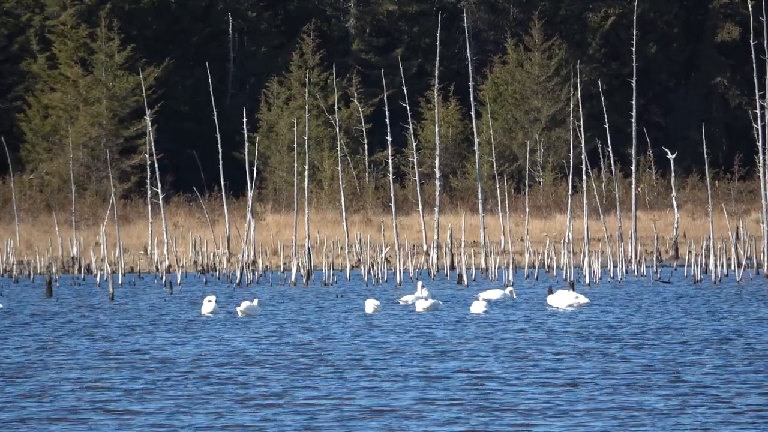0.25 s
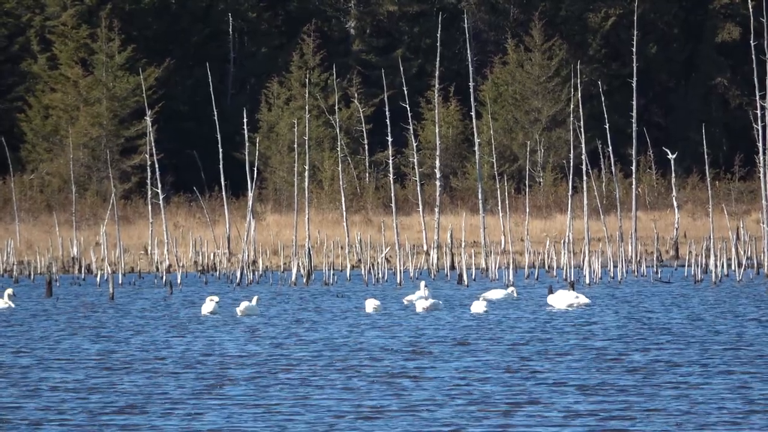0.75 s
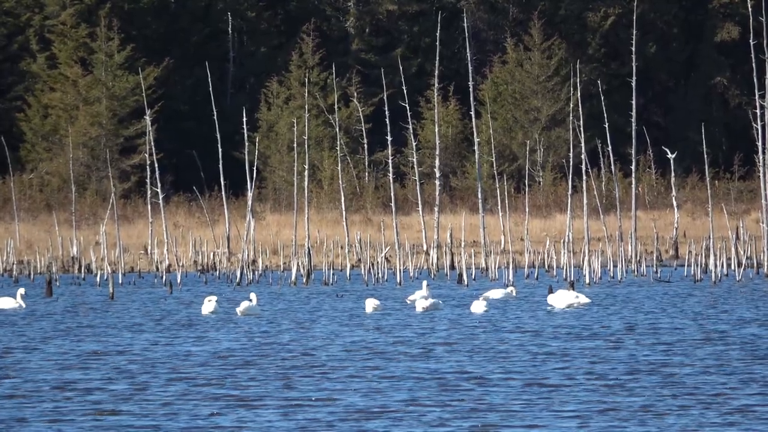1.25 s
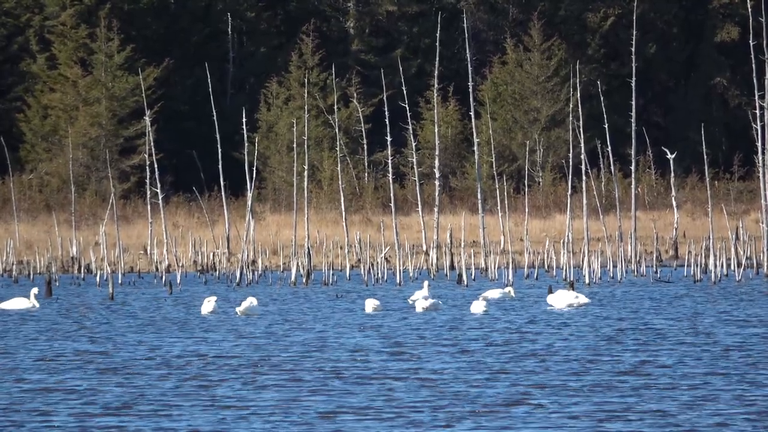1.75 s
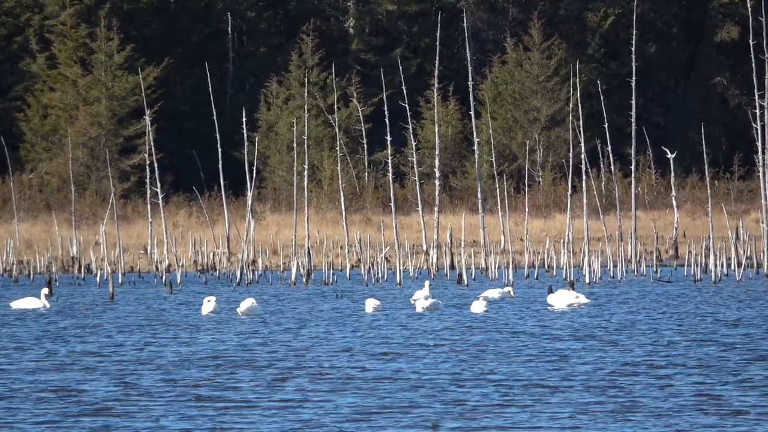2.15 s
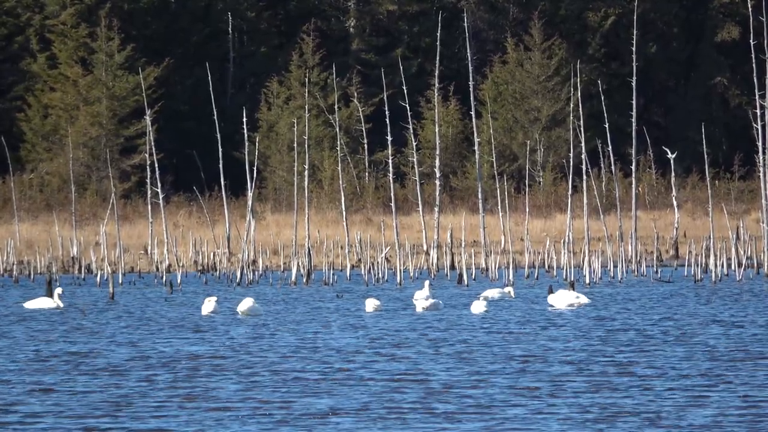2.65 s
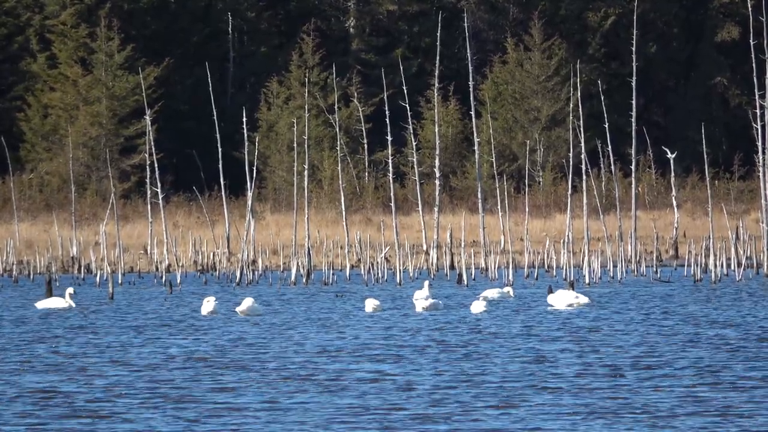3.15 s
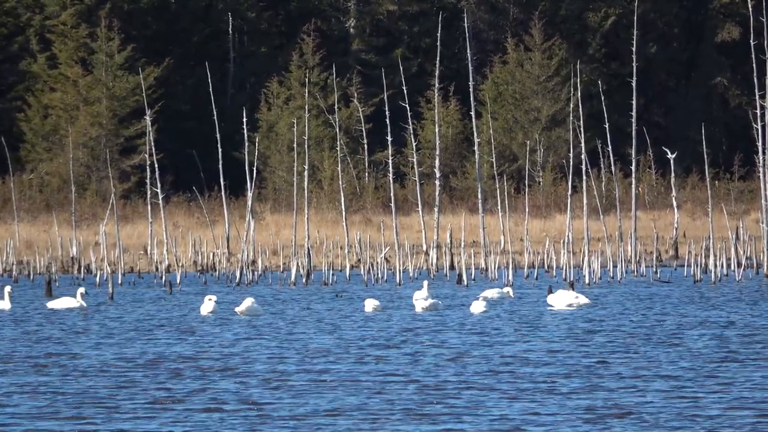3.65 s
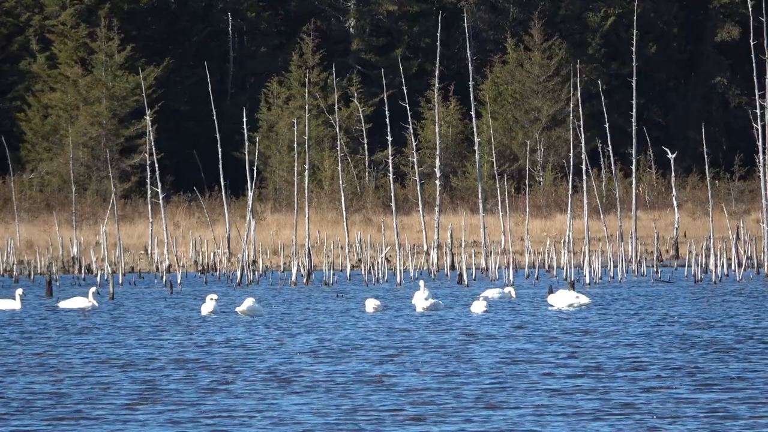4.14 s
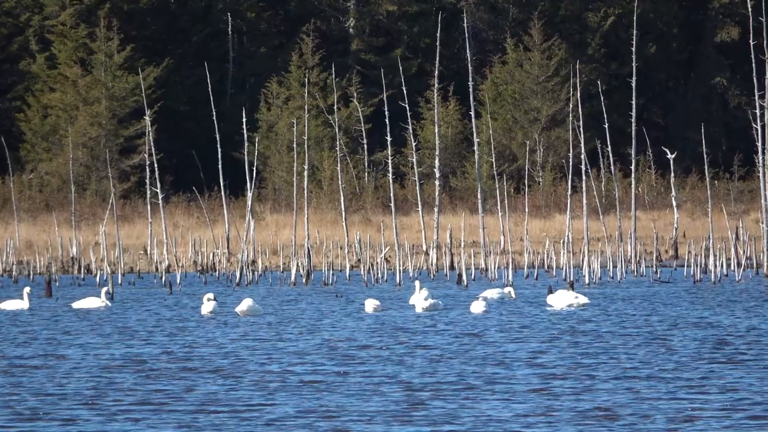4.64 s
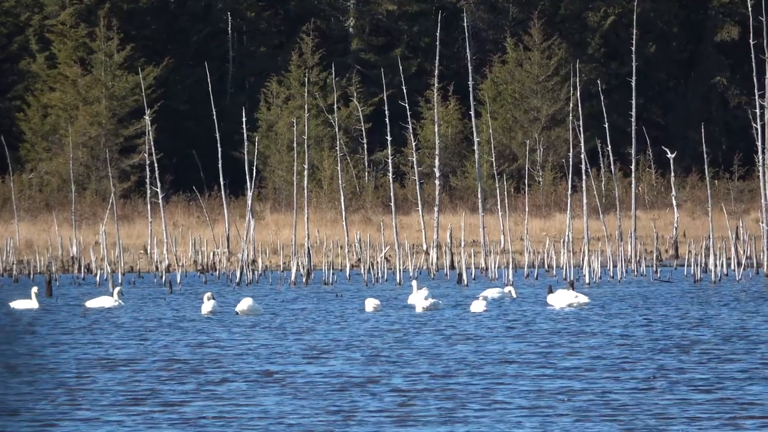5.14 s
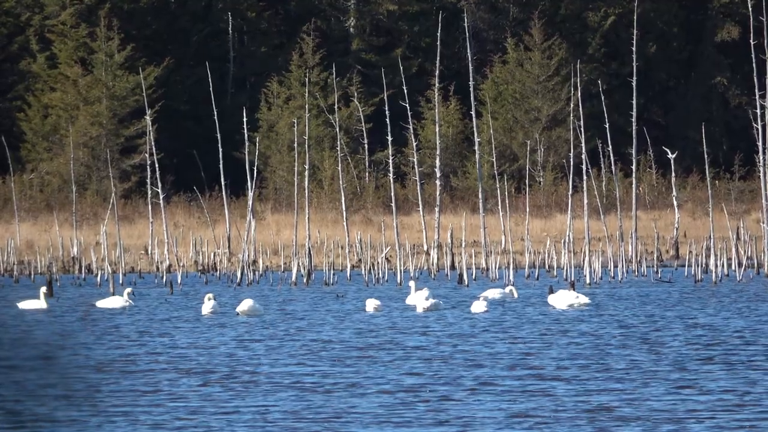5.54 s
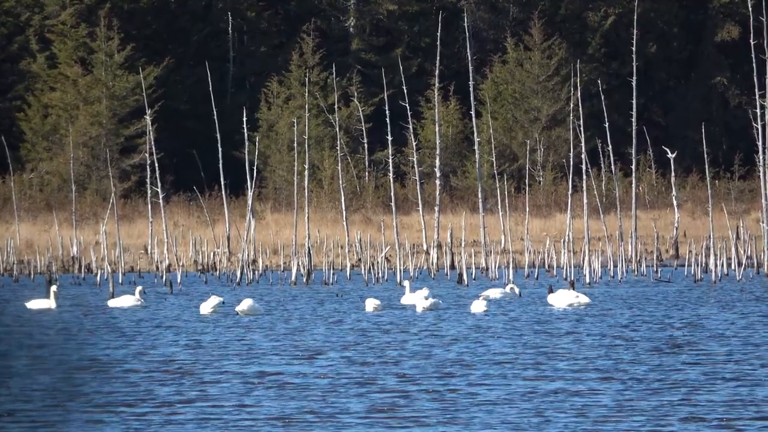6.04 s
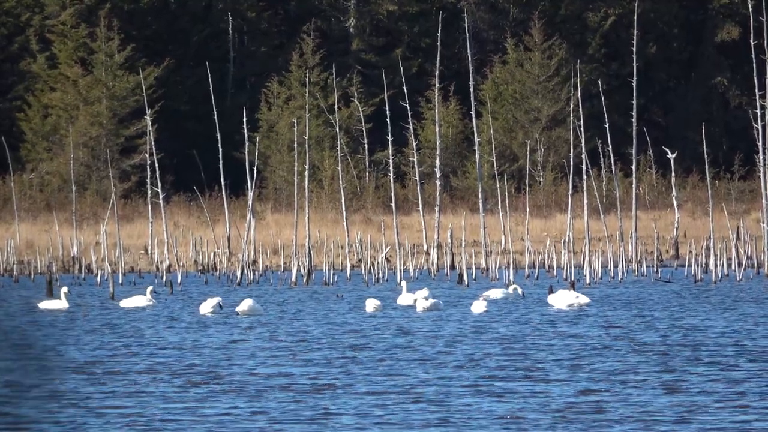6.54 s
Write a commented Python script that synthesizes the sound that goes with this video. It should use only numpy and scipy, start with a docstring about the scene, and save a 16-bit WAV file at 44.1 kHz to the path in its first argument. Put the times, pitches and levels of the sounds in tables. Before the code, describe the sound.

Heavy low wind rumble swells and bumps against an unshielded microphone beside an open lake. Behind it, far swans call in quick clear hoots and rough little croaks, thickening into chatter and then thinning out. Trees return a faint echo, and water and reeds hiss quietly. Toward the close, gusts roar and crackle, one longer honk sounds, and a big jolt of wind distorts the microphone.

```python
"""On a windy lake ringed by trees, distant swans honk and croak, and the trees throw the calls back.
Honks are sums of four sine partials; croaks are slow pulses mixed with breath noise.
Wind buffets the bare microphone with a heavy rumble of shaped noise, and at set moments overloads it.
Under it lie the murmur of the far flock and the hiss of ripples and reeds, both shaped noise,
with faint bright ticks and small puffs of wind made of short noise bursts."""
import sys
import numpy as np
from scipy import signal
from scipy.fft import rfft, irfft, next_fast_len
from scipy.io import wavfile
from scipy.ndimage import uniform_filter1d

SR = 44100
rng = np.random.default_rng(int(sys.argv[2]) if len(sys.argv) > 2 else 0)


def file_out(sig):
    """Save sig as 16-bit WAV at sys.argv[1]."""
    # one column per channel
    cols = np.atleast_2d(sig).T
    # limit, then scale
    lim = np.clip(cols, -1, 1)
    pcm = np.round(lim * 32767).astype(np.int16)
    wavfile.write(sys.argv[1], SR, pcm)


def magnitude_from_level(level_db):
    """Linear magnitude for a level in decibels (20 dB per decade)."""
    exponent = np.asarray(level_db, float) / 20
    return 10 ** exponent


N = 299439  # length of the scene in samples

# how the swan's windpipe boosts or weakens each pitch: (pitch_hz, gain_db)
WINDPIPE_CURVE = [(300, -8.5), (500, 4), (900, 1.5), (1200, 10), (1480, -1.5), (1700, -14), (2250, -19.5),
                  (4000, -49)]


def evened(x):
    """Scales a sound to an rms level of 1."""
    return x / np.sqrt(np.mean(x ** 2) + 1e-20)


def read(points, hz):
    """Reads a spectrum on a log-frequency axis, silent outside its ends."""
    point_hz, point_db = np.transpose(points)
    return np.interp(np.log(hz + 1), np.log(point_hz + 1), point_db, left=-120, right=-120)


def along(rows):
    """Draws each column of a time table as a line through every sample."""
    row_s, *columns = np.transpose(rows)
    return [np.interp(np.arange(N) / SR, row_s, column) for column in columns]


def add(mix, start_s, sound):
    """Mixes a sound in at its start time, cut off where the mix ends."""
    part = mix[round(start_s * SR):][:len(sound)]
    part += sound[:len(part)]


def filtered(x, points, size):
    """Shapes a sound by a spectrum, working on a block of the given size."""
    gain = magnitude_from_level(read(points, np.fft.rfftfreq(size, 1 / SR)))
    return irfft(rfft(x, size) * gain, size)


def noise(points):
    """Makes steady noise of the given spectrum, rms 1."""
    size = next_fast_len(N)
    return evened(filtered(rng.standard_normal(size), points, size)[:N])


def lumps(seconds, depth_db):
    """A random gain that wanders over about the given time, with the given rms depth."""
    width = max(round(seconds * SR), 1)
    smooth = uniform_filter1d(uniform_filter1d(rng.standard_normal(N), width), width)
    return magnitude_from_level(depth_db * evened(smooth))


def wobbled(hz, jitter):
    """Phase of a voice whose pitch trembles a little around hz; jitter is a share of the pitch."""
    wobble = evened(uniform_filter1d(rng.standard_normal(SR // 2), 150))[:len(hz)]
    return 2 * np.pi * np.cumsum(hz * (1 + jitter * wobble)) / SR


def honk(length_s, pitch_hz, glide_hz, first_db, octave_db):
    """A clean tone scoops up to pitch and sags at the end; the windpipe colours its upper two partials."""
    scoop, scoop_s = 0.0907, 0.01754  # share by which both ends are flat, and how fast that dies away
    attack_s, release_s = .04, .04
    third_db, fourth_db = -6, -17  # relative to the octave, before the windpipe
    t = np.arange(0, length_s, 1 / SR)
    flat = scoop * (np.exp(-t / scoop_s) + np.exp((t - length_s) / scoop_s))
    hz = (pitch_hz + glide_hz * (t / length_s - .5)) * (1 - flat)
    phase = wobbled(hz, jitter=.005)
    tone = magnitude_from_level(first_db) * np.sin(phase) + magnitude_from_level(octave_db) * np.sin(2 * phase)
    for k, db in enumerate((third_db, fourth_db), start=3):
        tone += magnitude_from_level(octave_db + db + read(WINDPIPE_CURVE, k * hz)) * np.sin(k * phase)
    swell = np.minimum(t / attack_s, 1) * np.minimum((length_s - t) / release_s, 1)
    return np.sqrt(2) * tone * np.sin(np.pi / 2 * swell) ** 2


def croak(length_s, start_hz, end_hz, level_db, rough):
    """Slow pulses through the windpipe; roughness shakes the pitch and mixes in breath noise each cycle."""
    size = round(length_s * SR)
    hz = start_hz + (end_hz - start_hz) * np.linspace(0, 1, size) ** 1.496
    phase = wobbled(hz, jitter=0.059 * rough)
    pulses = sum(np.cos(k * phase) for k in range(1, 16))
    breath = (1 + np.cos(phase)) ** 2 * rng.standard_normal(size)
    pulses = evened(filtered(pulses, WINDPIPE_CURVE, 4 * size)[:size])
    breath = evened(filtered(breath, WINDPIPE_CURVE, 4 * size)[:size])
    breath_share = np.clip(rough, 0, 1) ** 1.5
    voice = evened((1 - breath_share) * pulses + breath_share * breath)
    return magnitude_from_level(level_db) * voice * signal.windows.tukey(size, .85)


def shore(x):
    """Echoes of random sign: a dying scatter off the water and a late cluster from the tree line."""
    taps = np.zeros(SR // 2)
    slots = np.arange(300, len(taps) - 22, 22)  # one echo falls somewhere in each slot of 22 samples
    taps[slots + rng.integers(0, 22, len(slots))] = rng.choice([-1., 1.], len(slots))
    t = np.arange(len(taps)) / SR
    scatter = magnitude_from_level(-60 * t / .9)  # falls 60 dB in 0.9 s
    tree_line = .3 * np.exp(-((t - .125) / .03) ** 2)
    taps *= scatter + tree_line
    return signal.fftconvolve(x, taps / np.linalg.norm(taps))[:N]


def flock():
    """All calls, direct and echoed; gusty air over the water makes the far calls flicker."""
    # clear notes, levels before the swell, pitch before the scoop:
    # (start_s, length_s, middle_pitch_hz, glide_from_start_to_end_hz, fundamental_db, octave_db)
    honks = [(0.288, 0.099, 452, -19, -49.2, -61), (0.381, 0.14, 744, 53, -42, -46.5),
             (0.828, 0.065, 620, -55, -65, -47), (0.852, 0.11, 795, -57, -53, -52.5),
             (1.054, 0.089, 478, -68, -47, -55.4), (1.508, 0.14, 487, 89, -53, -66),
             (1.569, 0.12, 746, 26, -47, -43.5), (1.728, 0.12, 568, -5, -60.0, -40.5),
             (1.96, 0.119, 450, 61, -52, -57.5), (2.107, 0.093, 406, -76, -48.5, -60),
             (2.338, 0.078, 578, 58, -66.0, -39), (2.405, 0.06, 754, -73, -36, -45),
             (2.396, 0.13, 456.5, 24, -50, -53), (2.494, 0.081, 469, -22, -41, -47.8),
             (2.654, 0.12, 745.4, 46, -43, -40.5), (2.711, 0.067, 488, -7, -44, -40),
             (2.861, 0.069, 440, -62, -45, -58), (2.931, 0.073, 635, 77, -43.5, -43),
             (3.299, 0.072, 484, -16, -53, -44), (3.373, 0.11, 576.6, -13, -49, -34.5),
             (3.448, 0.064, 477, 0, -38, -47), (3.543, 0.085, 502.6, 52.5, -40.5, -39.0),
             (3.571, 0.129, 803, -129, -42, -52), (3.757, 0.12, 727, 92, -40, -41.5),
             (3.97, 0.056, 496, 73, -36.5, -63), (4.008, 0.1, 800, 46, -46.7, -75),
             (4.049, 0.064, 500, 79, -46, -43.6), (4.064, 0.08, 659, -43, -40.5, -45.5),
             (4.258, 0.061, 737, -24, -35.5, -53), (4.36, 0.051, 764, -123, -38, -59),
             (4.395, 0.098, 486, 34, -40.5, -44), (4.453, 0.067, 570, 94, -67.1, -37),
             (4.474, 0.099, 679, -60, -40.5, -40), (4.583, 0.079, 778, -107, -39.5, -47.5),
             (4.808, 0.13, 527.5, 22, -51, -41.3), (4.901, 0.075, 756, -5, -39.5, -43),
             (4.897, 0.084, 674, -86, -41, -42.5), (4.913, 0.082, 555, -14, -54.0, -47.2),
             (5.21, 0.058, 553, 46, -69, -39), (5.239, 0.087, 743, -96, -44.5, -44),
             (5.298, 0.09, 602, 4, -58, -43), (5.641, 0.074, 477, -4, -45, -45),
             (5.778, 0.066, 590, -8, -50.5, -43), (6.538, 0.35, 477, 36.5, -47, -44)]
    # low hoarse notes, level before the fades:
    # (start_s, length_s, start_pulse_rate_hz, end_pulse_rate_hz, level_db, roughness_0_to_1)
    croaks = [(0.372, 0.053, 153, 142, -44, 0.65), (1.558, 0.062, 263.4, 234, -42, 0.43),
              (1.726, 0.063, 264.5, 259.5, -40, 0.5), (2.466, 0.068, 209, 237, -47.5, 0.2),
              (2.639, 0.048, 227.4, 263, -38, 0.63), (2.862, 0.115, 222.7, 253.5, -49, 0.47),
              (3.2, 0.23, 161.5, 182.8, -46, 0.2), (3.347, 0.084, 172.2, 186.4, -39, 0.3),
              (3.546, 0.14, 188.6, 216.6, -41.5, 0.49), (3.993, 0.11, 205, 195.3, -44, 0.7),
              (4.36, 0.08, 250, 286, -41, 0.5), (4.433, 0.13, 191, 196.3, -43, 0.7),
              (4.789, 0.12, 241.5, 273.7, -39.5, 0.48), (5.215, 0.092, 260.6, 290, -43.5, 0.7),
              (5.64, 0.029, 227, 241, -43, 0.26), (5.772, 0.036, 266.3, 299, -44, 0.65)]
    calls = np.zeros(N)
    for start_s, *note in honks:
        add(calls, start_s, honk(*note))
    for start_s, *note in croaks:
        add(calls, start_s, croak(*note))
    calls *= lumps(.012, depth_db=1.8)
    return calls + magnitude_from_level(-10) * shore(calls)


def wind():
    """Turbulence at the microphone: noise layers of rumble, flutter and lumpy roar, swelled by gusts."""
    # wind between gusts, before the microphone: (time_s, rumble_db, flutter_db)
    calm = [(.05, -2.5, -28.5), (.3, -17, -29), (.8, -13, -23.5), (1.2, -15, -28), (1.55, -16.5, -34),
            (1.9, -15, -34), (2.2, -20, -33.5), (2.5, -15, -33.5), (2.9, -16, -31), (3.3, -16.5, -33.5),
            (3.6, -12, -29.5), (3.95, -15.5, -32.5), (4.4, -12, -32), (4.9, -13.5, -29),
            (5.3, -13.5, -28.5), (5.95, -11.5, -36), (6.4, -17, -26), (6.79, -15.5, -36)]
    # gusts that strike the capsule, length between the points where they have sunk to 1/e:
    # (middle_s, length_s, rumble_db, flutter_db, roar_db)
    gusts = [(0.406, .08, -4, -24.5, -39), (0.555, 0.09, -9, -30, -42.5), (.66, .1, -3, -38, -38.5),
             (0.925, 0.051, -7.5, -19.5, -43), (1.041, 0.07, -8.5, -41, -43), (1.389, .08, -5.5, -41, -55),
             (1.71, 0.053, -6, -19, -51), (2.86, 0.11, -9, -39, -59), (3.088, 0.1, -9, -30, -52),
             (3.224, 0.066, -11, -22, -58), (3.434, 0.12, -13, -31, -49), (3.73, 0.23, -7, -26, -46.5),
             (4.088, 0.17, -10.5, -24, -60), (4.535, 0.093, -12, -27, -42.5), (5.117, 0.12, -6.5, -28, -50),
             (5.405, 0.093, -2.5, -18, -27), (5.572, 0.18, -7, -21, -40), (5.666, 0.15, -17, -18.5, -39.5),
             (5.834, .07, -12, -26, -57), (6.135, 0.16, -7, -14.5, -29), (6.272, 0.078, -3, -37, -42),
             (6.371, 0.093, -6, -25, -36.5), (6.612, 0.21, -4.5, -21.5, -41),
             (6.678, 0.079, 0.5, -12.5, -36), (6.75, .04, -1.5, -33, -32.5)]
    # spectra of the three layers, relative level in each hertz: (pitch_hz, level_db)
    rumble_curve = [(1.8, -14.5), (3.0, 0), (24, 2.5), (36, -11), (70, -18), (91, -33), (150, -120)]
    flutter_curve = [(35, 10), (55, -7), (90, -5), (140, -15), (190, -30)]
    roar_curve = [(110, -75), (160, 5.5), (250, -4.5), (400, -17), (700, -29.5)]
    rumble_db, flutter_db = along(calm)
    # roar level at a flutter of -26 dB, and the share of the flutter's swings that it follows
    roar_db = -47.5 + 0.45 * (flutter_db + 26)
    t = np.arange(N) / SR
    power = magnitude_from_level([rumble_db, flutter_db, roar_db]) ** 2
    for middle_s, length_s, *gust_db in gusts:
        swell = np.exp(-2 * (2 * (t - middle_s) / length_s) ** 2)
        power += magnitude_from_level(gust_db)[:, None] ** 2 * swell
    rumble, flutter, roar = np.sqrt(power)
    lumpy_roar = evened(noise(roar_curve) * lumps(0.0083, depth_db=3))
    return rumble * noise(rumble_curve) + flutter * noise(flutter_curve) + roar * lumpy_roar


def bursts(events, low_hz, high_hz, decay_s):
    """Short band-limited bursts of noise, each with a quick rise and a soft fall."""
    out, t = np.zeros(N), np.arange(1500) / SR
    band = signal.butter(N=4, Wn=[low_hz, high_hz], btype="band", fs=SR, output="sos")
    shape = t / decay_s * np.exp(1 - t / decay_s)
    for start_s, peak_db in events:
        grain = evened(signal.sosfilt(band, rng.standard_normal(len(t))))
        add(out, start_s, magnitude_from_level(peak_db) / 2 * grain * shape)  # noise peaks reach about twice its rms
    return out


def small_noises():
    """Faint ticks and puffs: bright bursts that die at once, and duller ones that last a little longer."""
    # faint bright ticks: (start_s, rough_peak_db)
    ticks = [(0.8605, -51), (1.1992, -44), (2.3536, -41), (2.7537, -42), (2.9737, -46), (3.4152, -43),
             (3.5304, -42.5), (4.0123, -45), (4.389, -42), (4.4254, -42), (5.63, -39), (6.2617, -40),
             (6.4044, -41)]
    # small puffs of wind: (start_s, rough_peak_db)
    puffs = [(5.1, -40), (5.138, -46), (5.508, -48), (5.552, -39), (5.599, -40), (6.054, -52), (6.233, -36),
             (6.259, -44), (6.3, -39), (6.346, -37.5), (6.462, -37.5)]
    return bursts(ticks, 5000, 13000, decay_s=.0007) + bursts(puffs, 450, 1900, decay_s=.002)


def lake():
    """Shaped noise for the murmur of far birds and water, and for a hiss that crackles slightly."""
    # spectra, relative level in each hertz: (pitch_hz, level_db)
    murmur_curve = [(150, -15), (260, 1.5), (676, 0.5), (1170, -4), (2200, -16), (2860, -21), (4840, -120)]
    hiss_curve = [(1000, -1), (1700, -22.5), (1870, -19), (2730, -7.5), (4330, -3), (5560, -11), (7990, -6),
                  (12700, -14.5), (15600, -17)]
    # loudness of the hiss of ripples and reeds: (time_s, level_db)
    ripples = [(0.06, -57.5), (0.19, -56), (1.5, -58), (4.28, -56), (4.82, -53), (5.14, -56.5),
               (5.22, -54.5), (6.58, -56), (6.73, -59), (6.79, -56)]
    murmur = magnitude_from_level(-47) * evened(noise(murmur_curve) * lumps(.06, depth_db=.8))
    slow, crackle = lumps(0.037, depth_db=0.76), lumps(0.0017, depth_db=1.04)
    hiss = evened(noise(hiss_curve) * slow * crackle)
    return murmur + magnitude_from_level(along(ripples)[0]) * hiss


def scene():
    """Birds, wind, small noises and lake at one microphone."""
    return (flock() + wind() + small_noises() + lake())[None]


def low_pass(x):
    """Removes everything above the highest recorded frequency."""
    return signal.sosfilt(signal.butter(12, 15710, fs=SR, output="sos"), x)


def record(dry):
    """Near its stop the capsule goes deaf to all but a sagging drift, then jolts free; peaks are clipped."""
    # the capsule is pushed toward its stop and goes deaf, jolt level before its shaping:
    # (start_s, length_s, deafness_0_to_1, jolt_on_release_db)
    overloads = [(.653, .006, 1, -36), (5.425, .005, 1, -30), (5.59, .002, 1, -40), (6.119, .003, 1, -40),
                 (6.241, .028, .45, -50), (6.369, .005, 1, -44), (6.374, .03, .45, -50),
                 (6.671, .021, 1, -4), (6.698, .016, .55, -50), (6.745, .006, .9, -40)]
    t, after = np.arange(N) / SR, np.arange(1500) / SR
    deaf, sag, jolts = np.zeros(N), np.ones(N), np.zeros(N)
    jolt = np.minimum(after / .0013, 1) * np.exp(-after / .008)
    jolt += .016 * rng.standard_normal(len(after)) * np.exp(-after / .002)  # a brief crackle
    for start_s, length_s, deafness, jolt_db in overloads:
        end_s = start_s + length_s
        deaf[(t > start_s) & (t < end_s)] = deafness
        # the sag builds while the capsule is stuck and eases off afterwards
        stuck = np.clip(t - start_s, 0, length_s) * np.exp(-np.maximum(t - start_s - length_s, 0) / .012)
        sag *= np.exp(-(deafness ** 3 * stuck / .016) ** 2)
        add(jolts, end_s, magnitude_from_level(jolt_db) * jolt)
    lowpass = signal.butter(N=4, Wn=90., fs=SR, output="sos")
    drift = signal.sosfiltfilt(lowpass, dry)
    rest = (dry - drift) * (1 - uniform_filter1d(deaf, 30))
    swing = 1.04 * np.tanh(1.15 * drift)  # the membrane stiffens on wide swings
    mix = np.clip(sag * swing + rest + jolts, -1, 1)
    return low_pass(mix)


dry = scene()
out = record(dry)
file_out(out)
```